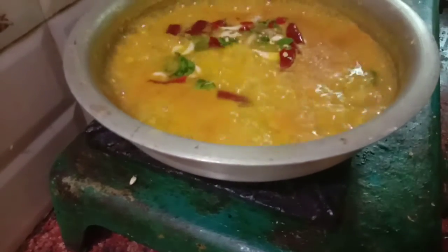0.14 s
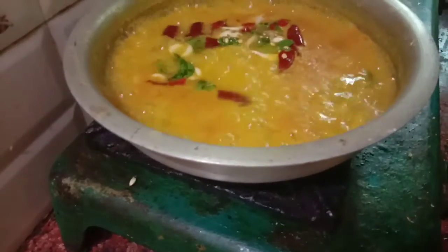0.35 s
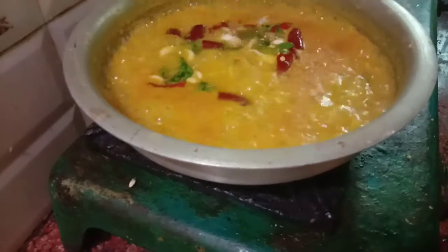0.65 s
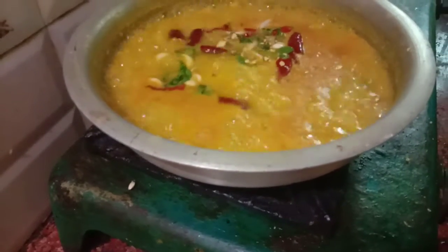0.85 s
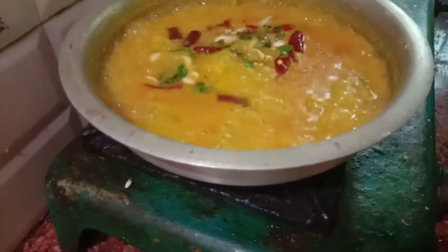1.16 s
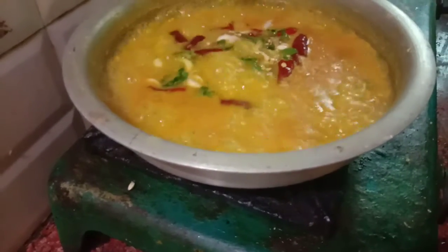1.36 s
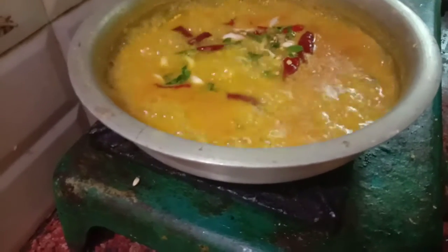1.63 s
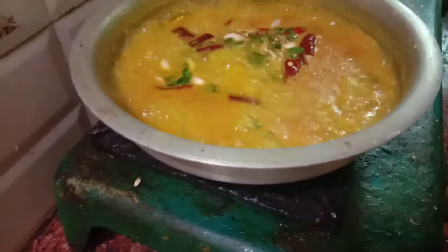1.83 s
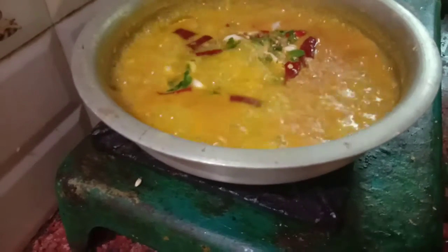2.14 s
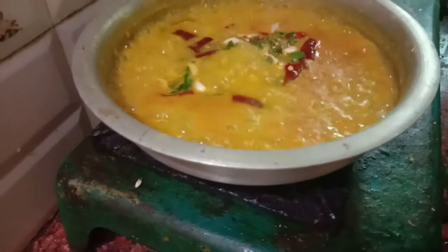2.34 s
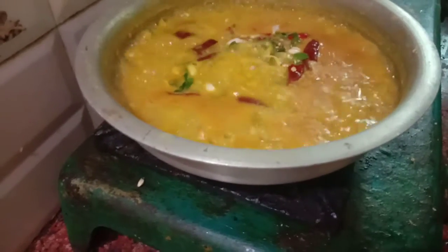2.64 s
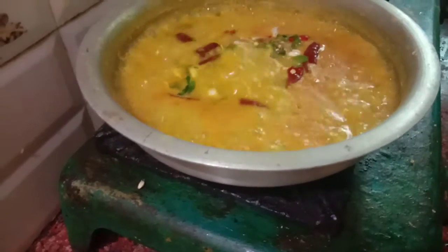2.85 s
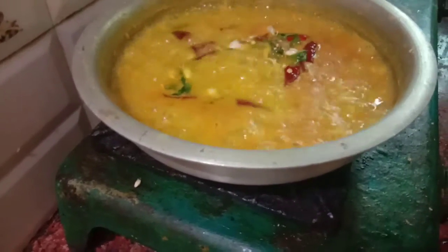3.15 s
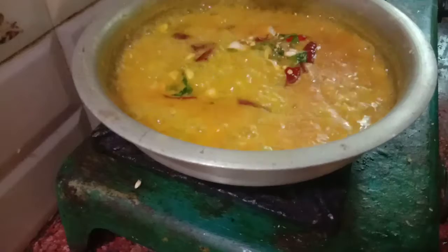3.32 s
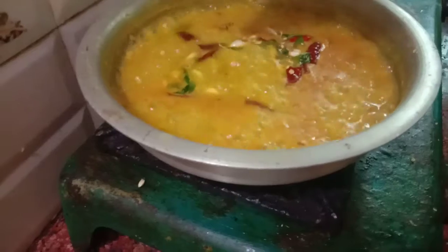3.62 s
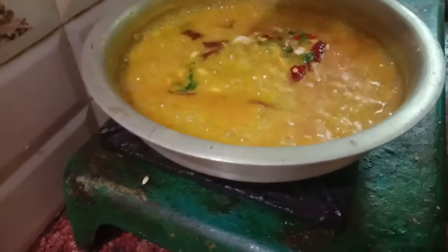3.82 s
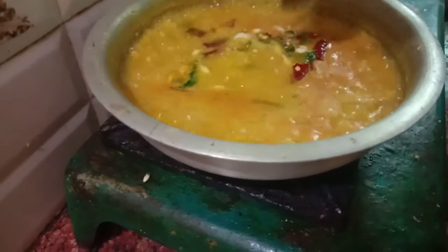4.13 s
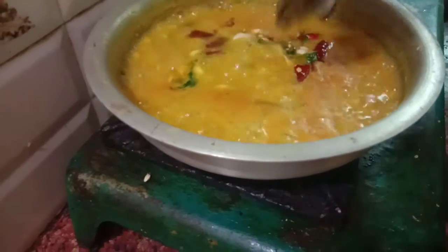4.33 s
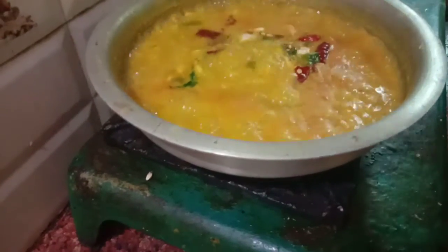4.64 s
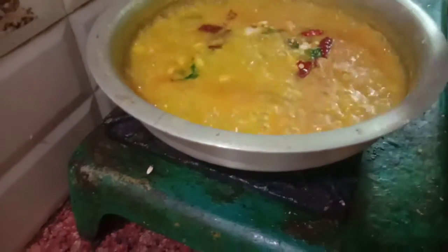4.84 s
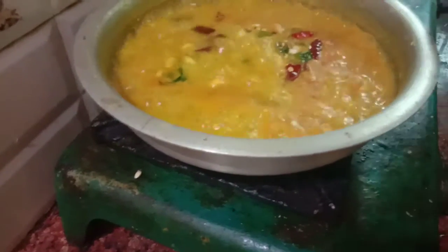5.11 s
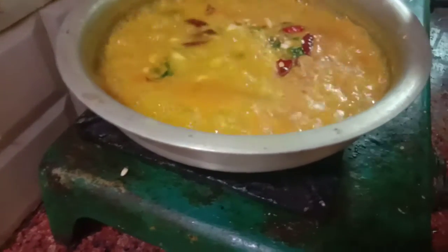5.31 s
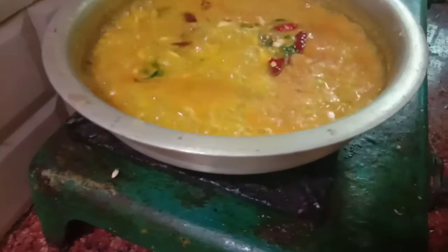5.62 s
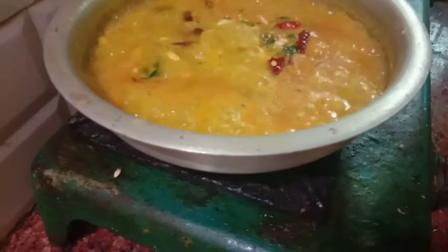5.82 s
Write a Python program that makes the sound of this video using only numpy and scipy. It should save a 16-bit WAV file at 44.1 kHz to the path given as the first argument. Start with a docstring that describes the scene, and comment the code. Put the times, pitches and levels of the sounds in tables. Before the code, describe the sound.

Close, slightly roomy sound of stew cooking: steady bright sizzle, fast mid-pitched bubbling and a very quiet burner rumble with hollow gurgles. Irregular loud pops crack and puff steam, briefly ringing the metal pot. They stop near three seconds, leaving plops, fine fat spits and ticks, then return from five seconds, several close together. The simmer never stops.

```python
"""Thick lentil curry simmers in an open aluminium pot on a stove in a small kitchen.
At once there are a low stove rumble, a dull burble and a patter of small bubbles with fizzing fat: filtered
noise and clicks. A big bubble bursts with a spit (noise and a sine) and rings the pot (decaying sines); steam
sighs, plops, thin ticks, fat spits, snaps and faint whistles join within the first second. Big bursts go on
to 2.9 s, pause while the small sounds carry on, and return in a cluster from 5 s."""
import sys
import numpy as np
from scipy import signal
from scipy.fft import rfft, irfft
from scipy.io import wavfile
from scipy.ndimage import uniform_filter1d, minimum_filter1d

SR = 44100
rng = np.random.default_rng(int(sys.argv[2]) if len(sys.argv) > 2 else 0)


def int16_out(signal):
    """Quantize to a 16-bit WAV file."""
    q = np.round(np.clip(np.atleast_2d(signal).T, -1, 1) * 32767)
    wavfile.write(sys.argv[1], SR, q.astype(np.int16))


N = 263277
TIME = np.arange(N) / SR

# tone of the stove rumble: f/Hz, relative level/dB
STOVE_TONE = [(25, -23), (48, -26.5), (70, -11.5), (100, -3.5), (160, -2), (215, -17.5), (285, -19),
              (335, -0.5), (450, -18.5), (570, -1.5), (750, -18.5), (1500, -39)]
# hollow resonances under the pot: f/Hz, width/Hz (doubled in each of two filter passes), relative level/dB
HOLLOW = [(165, 14.8, 0), (204.5, 14.5, 1.5), (237.8, 22.4, -1.5)]
# big gurgles under the pot: t/s of the height, level/dB
GURGLES = [(.28, -53), (.76, -49.5), (1.06, -50), (1.41, -50.5), (2.12, -51), (3.12, -51.5), (3.87, -53.5),
           (4.08, -50.5), (4.99, -48.5), (5.53, -51), (5.67, -45), (5.83, -50)]
# the simmer over time, before the mix trims: t/s, bubbling level/dB, fizz level/dB
SIMMER_LEVELS = [(0, -45.5, -48.5), (.5, -47, -46), (.85, -44, -46), (1.2, -47, -46), (1.8, -46, -44.5),
                 (2.4, -46, -44.5), (3.0, -46, -46.5), (3.35, -44.5, -45), (3.85, -42.5, -47),
                 (4.3, -47.5, -46), (4.7, -44, -45.5), (5.3, -43.5, -44.5), (5.97, -44.5, -44)]
# tone of the small bubbles: f/Hz, relative level/dB
BUBBLING_TONE = [(250, -23), (450, -15), (600, -9), (900, -1.5), (1100, -0.5), (1260, 8), (1550, -2),
                 (2000, 3), (3000, -8), (4500, -34), (8000, -21.5)]
# tone of the fizzing fat: f/Hz, relative level/dB
FIZZ_TONE = [(1000, -36), (2500, 11.5), (3450, 6.5), (3900, 9.5), (5000, 4), (5950, 12.5), (6750, 4),
             (7500, 10.5), (8400, 4), (10500, -2.5), (13400, -9), (14500, 0), (15300, 10), (15700, 9.5)]
# modes of the pot and the air in it, the strongest in beating pairs: f/Hz, relative level/dB, t60/s
POT_MODES = [(762, -19, .12), (859, -16, .121), (897, -14, .09), (1096, -17, .2), (1158, -14, .18),
             (1222, -9, .14), (1243, -4, .15), (1315, -10, .14), (1367, -12, .13), (1491, -14, .13),
             (1545, -13, .11), (1622, -6, .16), (1636, 0, .16), (1660, -10, .14), (2027, -12, .14),
             (2160, -12, .15), (2266, -15, .14), (2349, -12, .13), (2436, -16, .16), (2512, -9, .13),
             (2592, -11, .13), (3014, -16, .14), (3116, -18, .13), (3735, -15, .12), (3892, -16, .13),
             (4075, -15, .11), (4240, -16, .14), (4565, -18, .13), (4905, -20, .14), (4987, -17, .16),
             (5320, -20, .13), (5750, -21, .13), (5889, -21, .13), (6195, -17, .16), (6657, -14, .16),
             (6712, -21, .14), (7030, -20, .13), (7600, -17, .11), (7893, -22, .16), (8134, -24, .14),
             (9028, -16, .11)]
# tone shared by bursts, sighs, plop cracks and snaps: f/Hz, relative level/dB
BURST_TONE = [(100.0, -9.5), (450.0, -5), (800.0, 3), (1100.0, -1.5), (1500.0, 1), (2000.0, -1.4),
              (2450.0, 2.5), (3100.0, -2.5), (4200.0, -0.3), (5400.0, -4), (7300.0, -2), (10500.0, -14),
              (13700.0, -12), (15200.0, -12), (16000.0, -14.5)]
# slow bubbles that sigh open: t/s of the height, half length/s, level/dB before the trim, treble/dB,
# cavity f/Hz, answer of the pot/dB
SIGHS = [(0.047, 0.048, -37.5, 12, 1600, 25), (0.721, 0.042, -35, 11.5, 1580, 22),
         (1.003, 0.014, -29, 9.5, 1650, 21), (1.322, 0.041, -44.5, 18.5, 1290, 20),
         (1.48, 0.018, -35, 10.5, 2140, 20), (1.639, 0.054, -33, -0.5, 1770, 22),
         (2.384, 0.027, -32, 3, 1390, 19), (2.688, 0.017, -25.5, -2, 1380, 18),
         (5.197, 0.034, -30, 5, 1214, 26), (5.277, 0.027, -31.5, 8, 1330, 26),
         (5.685, .0212, -37, 13.5, 1230, 23)]
# bursting bubbles: t/s, crack level/dB, crack t60/s, steam level/dB, steam t60/s, cavity f/Hz, note level/dB,
# bass/dB, treble/dB, crater resonances [(f/Hz, lift/dB)], ring of the whole pot/dB,
# modes struck hardest [(f/Hz, level/dB)]
POPS = [ (0.0062, -19, 0.014, -21, 0.076, 1587, -17, -11, 0, [(850, 14.5), (1620, 6), (2450, 5), (3850, 1)],
        -25.5, [(762, -32.5), (897, -25), (1622, -19), (2436, -26)]),
        (0.303, -22.5, .02, -21.5, 0.12, 1658, -18.5, -2.5, 4.5, [(866, 7), (1690, 5), (3980, 7), (5130, 7),
        (9100, 12)], -31.5, [(1545, -39), (1622, -14), (3014, -26.5), (4905, -32)]),
        (0.6344, -22.5, .02, -30.5, 0.086, 2350, -27, 3, 16, [(1030, -2), (1616, 8), (2200, 21.5),
        (3760, 11), (9020, 8)], -46, [(3735, -31.5), (4075, -38), (6657, -39)]),
        (0.943, -9.5, .0175, -18, 0.14, 2360, -11, -21, -11.5, [(1650, 7), (2330, 8), (3600, 0),
        (6070, 7.5), (7165, 0), (9020, 8)], -39, [(1622, -16), (2349, -18), (4987, -28), (7030, -25)]),
        (1.229, -10, 0.0075, -40, 0.14, 2630, -39, -2, 5, [(2400, 12.5), (3490, 9), (4880, 9), (7100, 4),
        (9100, 17), (11470, 11)], -42, [(1243, -38), (1622, -30.5), (7030, -30), (9028, -27)]),
        (1.3683, -23, 0.02, -27, 0.11, 2110, -25, -15.5, -10.5, [(866, 10), (2160, -1), (6500, 3),
        (9100, 5), (11370, 0)], -37, [(2160, -26), (3116, -34), (6712, -31.5)]),
        (1.8939, -15.5, 0.047, -27.5, 0.16, 1683, -16, -16, -11.5, [(1726, 11.5), (2100, 7.5), (3870, 8.5),
        (6640, 12.5), (7865, 7), (10440, 7)], -34, [(1491, -28), (1660, -15.5), (2027, -34),
        (2592, -27.5)]), (2.1477, -15.5, 0.021, -25.5, 0.17, 2046, -14.5, -26, -8.5, [(2120, 2), (4200, 3),
        (6640, 7), (9630, 8)], -34, [(2160, -28), (2512, -19.5), (4987, -29), (5889, -33), (6657, -34)]),
        (2.2293, -15.5, .0215, -34, 0.42, 2450, -43, -12, -3.5, [(974, 4), (2930, 2), (3650, 3.5),
        (5000, 3), (9020, 7)], -31, [(2512, -34), (4987, -30), (9028, -21)]),
        (2.6233, -16.5, 0.027, -19, 0.094, 1350, -23, -11, -10.5, [(1406, 9), (2374, 7), (3870, 8.5),
        (8350, 5), (11470, 8)], -30, [(1222, -33), (1367, -31), (1636, -16.5), (5320, -30), (6195, -31),
        (7893, -28.5)]), (2.8464, -12.5, 0.03, -26, 0.11, 2407, -18, -4, 18, [(919, 17), (1440, 18),
        (2374, 18), (3750, 11), (4300, 9), (5800, 6.5)], -32, [(1636, -27), (2266, -31), (4240, -36),
        (5750, -35), (6195, -31), (6657, -31), (8134, -42)]),
        (4.9702, -11.5, 0.026, -44, 0.3, 1380, -20, -7, -11, [(1275, 16), (2500, 4), (4150, 8.5), (6860, 7),
        (9450, 8), (11180, 10)], -25, [(1243, -13.5), (1315, -26), (1367, -27), (1636, -10),
        (2512, -17.5)]), (4.9967, -17.5, 0.018, -36, 0.12, 1600, -23, -5, -25, [(1250, 18)],
        -35, [(1222, -17.5), (1660, -38)]), (5.0477, -32, .015, -36, 0.11, 1637, -27, -3, -24, [(1200, 18)],
        -37, [(1222, -29.5)]), (5.534, -14, 0.015, -28, 0.22, 2500, -38, -3, -2, [(1307, 3), (2463, 10),
        (4630, 14.5), (6790, 12), (7550, 4.5), (9280, 11)], -21.5, [(1243, -25.5), (1636, -24), (2512, -26),
        (2592, -22), (4565, -39)]), (5.6256, -16, 0.024, -25, 0.077, 2600, -37, 5.5, 5, [(1180, 4),
        (2740, 3), (4150, 4), (6210, 12.5), (7470, 6)], -27.5, [(2592, -23.5), (6657, -33), (7600, -26)]),
        (5.637, -30, 0.013, -28.5, 0.26, 1297, -21.5, -3.5, -6, [(1307, 15), (1690, 3), (6140, 8),
        (7320, 10), (9540, 10)], -21.5, [(1243, -16), (1315, -23), (1636, -16.5)]),
        (5.8945, -21.5, 0.018, -31.5, 0.12, 1180, -28, -3.5, -23, [(1180, 0), (4630, 9), (7165, 8),
        (9190, 13)], -43, [(1243, -25.5), (1636, -26.5)]),
        (5.9134, -26, .02, -38, 0.092, 1634, -36, -2, 1, [(4550, 13), (5450, 9), (6750, 11)],
        -39, [(6712, -35.5)])]
# the clearest small plops: t/s, level/dB before the trim, cavity f/Hz
PLOPS = [(0.0842, -23.5, 1560), (0.2762, -25, 1275), (0.5124, -28.5, 1266), (1.1314, -29, 1235),
         (1.474, -28, 1503), (2.5212, -23.5, 1265), (2.7094, -24, 1350), (2.953, -34, 1210),
         (3.022, -34, 1140), (3.0971, -30, 1086), (3.162, -34, 1280), (3.3305, -29, 1250),
         (3.465, -36, 1300), (3.52, -26.5, 1580), (3.599, -32, 1270), (3.71, -31, 1310),
         (3.7904, -26.5, 1346), (3.908, -31, 1260), (4.024, -40, 830), (4.245, -32, 1360),
         (4.321, -34, 1240), (4.3637, -33, 1280), (4.618, -41, 1320), (4.8179, -34, 1230),
         (4.934, -37, 1280)]
# thin high ticks: t/s, level/dB before the trim
TICKS = [(0.178, -21.5), (0.1958, -20.5), (0.444, -22), (0.7705, -29.5), (1.0867, -22.5), (1.4476, -28),
         (2.036, -25), (2.746, -23), (3.0345, -24), (3.8363, -35), (4.0135, -30), (4.396, -28),
         (5.337, -23)]
# the clearest fine spits of fat: t/s, level/dB before the trim, f/Hz
SPITS = [(0.3656, -26.5, 5950), (0.475, -32, 4970), (1.797, -33, 5370), (2.1, -30, 5660),
         (2.4653, -31.5, 5920), (2.9683, -34, 5960), (3.273, -36, 6150), (3.9063, -31, 5800),
         (3.983, -31.5, 5600), (4.184, -35, 5600), (4.1999, -30, 5960), (4.2469, -38, 4780),
         (4.3665, -29.5, 3800), (4.4175, -31, 8000), (4.4992, -27, 6050), (4.8575, -37, 5800),
         (5.0364, -30, 6100)]
# droplets that snap: t/s, level/dB
SNAPS = [(.683, -40), (.722, -30), (.757, -33), (1.431, -33.5), (3.219, -48), (4.501, -37), (5.216, -44),
         (5.27, -20)]
# steam singing through a pinhole: t/s of the height, half length/s, f/Hz, level/dB
WHISTLES = [(0.705, 0.015, 6700, -45), (1.663, 0.033, 6680, -43), (1.73, 0.093, 3750, -49.5),
            (3.348, 0.026, 3810, -51.5), (3.52, 0.028, 8890, -56)]


def from_db(db):
    """Decibels to amplitude."""
    return 10 ** (np.asarray(db) / 20)


def rms_one(x):
    """Levels a signal to an RMS of 1."""
    return x / np.sqrt(np.mean(x ** 2) + 1e-20)


def dying(t, t60):
    """Decay of 60 dB in t60 seconds."""
    return from_db(-60 * t / max(t60, 1e-4))


def swell(s, half):
    """Bell-shaped rise and fall around time s."""
    return np.exp(-.5 * np.minimum(((TIME - s) / half) ** 2, 100))


def add(out, s, sound):
    """Mixes a sound in from time s on."""
    i = max(round(s * SR), 0)
    out[i:i + len(sound)] += sound[:max(N - i, 0)]


def drift(rate):
    """Random wander: normal draws of spread 1, rate of them a second, joined by straight lines."""
    knots = rng.standard_normal(int(N / SR * rate) + 2)
    return np.interp(TIME * rate, np.arange(len(knots)), knots)


def grains(per_s, spread_db):
    """Random clicks, many small and a few large."""
    sizes = from_db(spread_db * np.minimum(rng.exponential(1, N), 4.5))
    signs = rng.choice([-1, 1], N)
    return sizes * signs * (rng.random(N) < per_s / SR)


def colour(x, spectrum, size=4096):
    """Causal (minimum-phase) filter with the given spectrum; white noise keeps its power."""
    hz, db = np.transpose(spectrum)
    gain = from_db(np.interp(np.log(np.fft.rfftfreq(size, 1 / SR) + 1), np.log(hz), db))
    # folding the cepstrum forward in time gives the minimum-phase response
    cepstrum = irfft(np.log(gain))[:size // 2]
    cepstrum[1:] *= 2
    response = irfft(np.exp(rfft(cepstrum, size)))
    return signal.fftconvolve(x, response / np.linalg.norm(response))[:len(x)]


def resonance(x, hz, width_hz):
    """Two-pole band-pass with gain close to 1 on top."""
    r = np.exp(-np.pi * width_hz / SR)
    zeros = np.array([1, 0, -1]) * (1 - r * r) / 2
    poles = [1, -2 * r * np.cos(2 * np.pi * hz / SR), r * r]
    return signal.lfilter(zeros, poles, x + 1e-18)


def double_resonance(x, hz, width_hz):
    """The same band-pass twice, for steeper sides."""
    return resonance(resonance(x, hz, width_hz), hz, width_hz)


def low_cut(x, hz, order=2):
    """High-pass that clears the bass."""
    return signal.sosfilt(signal.butter(order, hz, "high", fs=SR, output="sos"), x)


def low_pass(x, hz, order=1):
    """Low-pass that keeps the body of a sound."""
    return signal.sosfilt(signal.butter(order, hz, fs=SR, output="sos"), x)


def brighten(x, treble_db, corner_hz=3600):
    """Treble shelf."""
    low = low_pass(x, corner_hz)
    return low + from_db(treble_db) * (x - low)


def hump(hz, centre_hz, octaves):
    """Bell on a log-frequency axis, 1 on top."""
    return np.exp(-(np.log2(hz / centre_hz) / octaves) ** 2)


def kitchen(x, wet_db=-5, t60=0.28, treble_t60=0.18):
    """Dense reflections from close walls; the treble dies first."""
    t = TIME[:SR // 2]
    echoes = rng.standard_normal(len(t)) * (t > .003)
    low = low_pass(echoes, 4000)
    response = low * dying(t, t60) + (echoes - low) * dying(t, treble_t60)
    return x + from_db(wet_db) * signal.fftconvolve(x, response / np.linalg.norm(response))[:N]


def stove(rumble_db=-59.5, gurgle_half_s=0.04, murmur_db=-60, wander_db=3.5, wander_per_s=19):
    """A steady low rumble, and gurgling that sounds the hollow under the pot."""
    rumble = from_db(rumble_db) * colour(rng.standard_normal(N), STOVE_TONE)
    hollow = np.zeros(N)
    for hz, width, db in HOLLOW:
        hollow += from_db(db) * rms_one(double_resonance(rng.standard_normal(N), hz, 2 * width))
    # even strength, before the gurgles swell it
    hollow /= np.sqrt(uniform_filter1d(hollow ** 2, size=4000) + 1e-9)
    murmur = from_db(murmur_db + wander_db * drift(wander_per_s))   # faint gurgling between the big ones
    big = sum(from_db(db) * swell(s, gurgle_half_s) for s, db in GURGLES)
    return rumble + hollow * np.hypot(murmur, big)


def blubs(level_db=-66):
    """Larger bubbles break low and dull in the thick lentils, merging into a soft burble."""
    pitches = np.geomspace(290, 820, 12)
    notes = sum(resonance(grains(28, spread_db=5.0), hz, hz / 14) for hz in pitches)
    return from_db(level_db) * rms_one(notes)


def pot_answer(x):
    """The pot's modes, driven by a sound; each mode's width follows from its decay time."""
    return sum(from_db(db) * resonance(x, hz, np.log(1000) / np.pi / t60) for hz, db, t60 in POT_MODES)


def crackles(per_s=70, clump_db=3.0, spread_db=4.5, sharpness=7):
    """Fine beads of fat burst one by one, each ringing at one of 20 high pitches."""
    clumps = from_db(clump_db * drift(rate=37))
    pitches = np.geomspace(2200, 15000, 20)
    beads = sum(resonance(grains(per_s * clumps, spread_db), hz, hz / sharpness) for hz in pitches)
    return rms_one(kitchen(beads, wet_db=-4.5))


def simmer(bubble_db=-1, ring_db=-7, wash_db=-8, fizz_db=-4.0, hiss_db=-2.5):
    """More than a thousand little bubbles a second, in clumps, with fat fizzing between them."""
    s, bubbling_db, fizzing_db = np.transpose(SIMMER_LEVELS)
    clumps = from_db(4.5 * drift(rate=19))
    notes = np.zeros(N)
    for hz in np.geomspace(480, 4000, 28):
        notes += resonance(grains(38 * clumps, spread_db=4.0), hz, hz / 15) / np.sqrt(hz)
    notes = colour(notes, BUBBLING_TONE)
    bubbles = from_db(bubble_db) * rms_one(kitchen(notes + from_db(ring_db) * pot_answer(notes)))
    bubbles += from_db(wash_db) * colour(rng.standard_normal(N), BUBBLING_TONE)
    hiss = from_db(hiss_db) * rng.standard_normal(N)
    fizz = colour(from_db(fizz_db) * crackles() + hiss, FIZZ_TONE)
    bubbles *= from_db(np.interp(TIME, s, bubbling_db))
    fizz *= from_db(np.interp(TIME, s, fizzing_db))
    return low_cut(bubbles + fizz, hz=246)


def sighs(level_db=-10.5, throat_db=3, sputter_db=3.5, crackle_db=-2):
    """Steam and droplets sputter through a slowly opening hole, sounding the cavity and the pot."""
    out, drive = np.zeros((2, N))
    jet = rms_one(grains(1500, spread_db=0.0) * from_db(sputter_db * drift(rate=110)))
    droplets = rms_one(grains(170, spread_db=0.5))
    spray = rms_one(colour(jet + from_db(crackle_db) * droplets, BURST_TONE))
    for s, half, db, treble_db, hz, answer_db in SIGHS:
        puff = from_db(db + level_db) * spray * swell(s, half)
        voiced = puff + from_db(throat_db) * resonance(puff, hz, 0.31 * hz)
        out += brighten(voiced, treble_db)
        drive += from_db(answer_db) * (voiced - .5 * puff)
    return low_cut(kitchen(out) + pot_answer(drive), hz=550)


def cavity(t, hz, cycles, rise):
    """The air in an opening bubble rings briefly, its pitch rising as the hole widens."""
    t60 = cycles / hz
    pitch = hz * (1 + rise * (np.minimum(t / t60, 1) - .2))
    return np.sin(2 * np.pi * np.cumsum(pitch) / SR) * dying(t, t60)


def burst_spectrum(crater, bass_db, treble_db, octaves_at_1k=0.3, bass_hz=1150, treble_hz=4000):
    """Colour of one burst: crater resonances, the higher the sharper, and shelves for bass and treble."""
    hz = np.geomspace(100, 16000, 200)
    tone_hz, tone_db = np.transpose(BURST_TONE)
    db = np.interp(np.log(hz), np.log(tone_hz), tone_db)
    for centre_hz, lift_db in crater:
        db += lift_db * hump(hz, centre_hz, octaves_at_1k * np.sqrt(1000 / centre_hz))
    db += bass_db / (1 + (hz / bass_hz) ** 6)
    db += treble_db / (1 + (treble_hz / hz) ** 3)
    return np.transpose([hz, db])


def pot_walls(x, echo=0.3, count=7, above_hz=2900):
    """The pot's wall reflects the treble within 3.4 ms, combing each burst in a way of its own."""
    response = np.zeros(SR // 300)
    delays = rng.integers(SR // 3000, len(response), count)
    response[delays] = echo * rng.choice([-1, 1], count)
    response[0] = 1   # direct sound
    treble = low_cut(x, above_hz, order=3)
    combed = np.convolve(treble, response / np.linalg.norm(response))[:len(x)]
    return low_pass(x, above_hz, order=3) + combed


def pops(split_db=11, ragged_db=6.0):
    """The skin cracks, the cavity rings and steam sputters out through the crater."""
    out, t = np.zeros(N), TIME[:SR // 3]
    for s, crack_db, crack_t60, steam_db, steam_t60, hz, note_db, bass_db, treble_db, crater, *_ in POPS:
        sputter = rms_one(from_db(ragged_db * drift(rate=640)[:len(t)]))
        crack = from_db(crack_db) * dying(t, crack_t60)
        steam = from_db(steam_db) * dying(t, steam_t60) * sputter
        flow = rng.standard_normal(len(t)) * np.hypot(crack, steam)
        split = from_db(crack_db + split_db) * (t == 0)   # the instant the skin gives way
        rush = colour(split + flow, burst_spectrum(crater, bass_db, treble_db))
        note = from_db(note_db) * low_cut(cavity(t, hz, cycles=106, rise=0.035), 0.37 * hz)
        add(out, s, pot_walls(rush) + note)
    return low_cut(out, hz=170)


def pot_ring(scatter_db=2.0, build_s=0.015):
    """Every burst rings the whole pot; where it happens decides which few modes stand out."""
    out, t = np.zeros(N), TIME[:SR // 3]
    pitches, levels, t60s = np.transpose(POT_MODES)
    for s, *_, pot_db, struck in POPS:
        strengths = levels + pot_db + scatter_db * rng.standard_normal(len(POT_MODES))
        for hz, db in struck:
            strengths[np.argmin(np.abs(pitches - hz))] = db
        ring = np.zeros(len(t))
        for hz, db, t60 in zip(pitches, strengths, t60s):
            ring += from_db(db) * np.sin(2 * np.pi * (hz * t + rng.random())) * dying(t, t60)
        add(out, s, ring * (1 - dying(t, build_s)))
    return out


def faint_plops(per_s=30, level_db=-41.5, scatter_db=4.5, centre_hz=1518, scatter_octaves=0.402):
    """Random plops, scattered round one level and pitch, as (t/s, level/dB, f/Hz)."""
    times = TIME[rng.random(N) < per_s / SR]
    scatter = rng.standard_normal((len(times), 2))
    return [(s, level_db + scatter_db * size, centre_hz * 2 ** (scatter_octaves * pitch))
            for s, (size, pitch) in zip(times, scatter)]


def plops(level_db=-1, crack_db=-12):
    """Smaller bubbles, a few clear and many faint: a tiny crack and a short cavity note."""
    out, t = np.zeros(N), TIME[:SR // 10]
    for s, db, hz in list(PLOPS) + faint_plops():
        crack = from_db(crack_db) * colour(rng.standard_normal(len(t)) * dying(t, 0.063), BURST_TONE)
        add(out, s, from_db(db + level_db) * (crack + cavity(t, hz, cycles=42.7, rise=0.034)))
    return low_cut(out, hz=375)


def ticks(level_db=1, lower_db=-13, tick_hz=15870):
    """Thin, very high ticks of one pitch with a weaker lower ring: dying noise through resonances."""
    out, t = np.zeros(N), TIME[:SR // 10]
    for s, db in TICKS:
        burst = rng.standard_normal(len(t)) * dying(t, 0.044)
        high = 4 * double_resonance(burst, tick_hz, 1370)
        lower = from_db(lower_db) * 2 * resonance(burst, 0.54 * tick_hz, 2900)
        add(out, s, from_db(db + level_db) * (high + lower))
    return out


def spits(level_db=-3):
    """Fine spits of fat: dying noise through one resonance each."""
    out, t = np.zeros(N), TIME[:SR // 10]
    for s, db, hz in SPITS:
        burst = rng.standard_normal(len(t)) * dying(t, 0.061)
        add(out, s, from_db(db + level_db) * 2 * resonance(burst, hz, 960))
    return out


def snaps(t60=0.0044):
    """Single droplets snap: very short bursts of bright noise."""
    out, t = np.zeros(N), TIME[:SR // 20]
    for s, db in SNAPS:
        burst = colour(rng.standard_normal(len(t)) * dying(t, t60), BURST_TONE)
        add(out, s, from_db(db) * brighten(burst, treble_db=5.5))
    return out


def whistles(width_hz=65):
    """Steam sings faintly through a pinhole: a narrow, unsteady tone that swells and fades."""
    out = np.zeros(N)
    for s, half, hz, db in WHISTLES:
        tone = rms_one(double_resonance(rng.standard_normal(N), hz, width_hz))
        out += from_db(db) * tone * swell(s, half)
    return out


def scene():
    """The single events sound in the kitchen, over the steady simmer and the stove."""
    events = kitchen(blubs() + pops() + plops() + ticks() + spits() + snaps())
    return (stove() + simmer() + sighs() + events + pot_ring() + whistles())[None]


def record(dry, ceiling_db=-6.5, release_db_per_s=250):
    """A look-ahead limiter ducks around the loudest peaks; the top is cut."""
    over = np.maximum(20 * np.log10(np.abs(dry[0]) + 1e-9) - ceiling_db, 0)
    fall = release_db_per_s * TIME
    held = np.maximum.accumulate(over + fall) - fall
    gain_db = uniform_filter1d(minimum_filter1d(-held, size=441), size=441)   # 10 ms windows
    top_cut = signal.cheby2(16, 60, 16150, fs=SR, output="sos")   # 60 dB down from 16150 Hz up
    return signal.sosfilt(top_cut, dry * from_db(gain_db))


dry = scene()
out = record(dry)
int16_out(out)
```